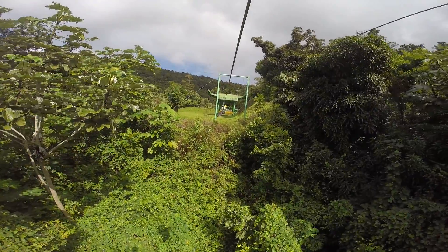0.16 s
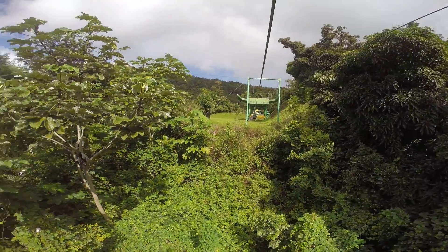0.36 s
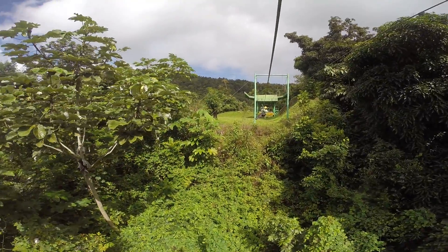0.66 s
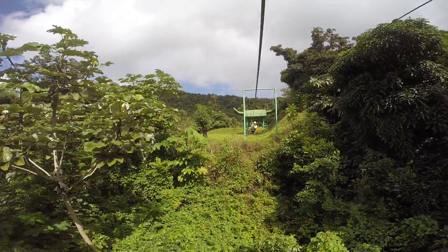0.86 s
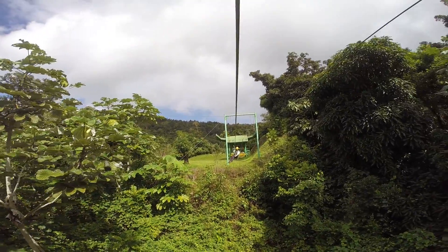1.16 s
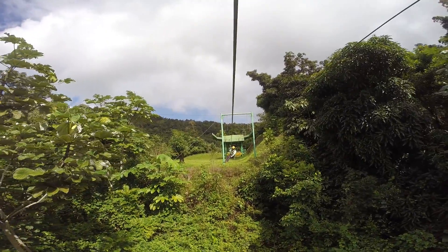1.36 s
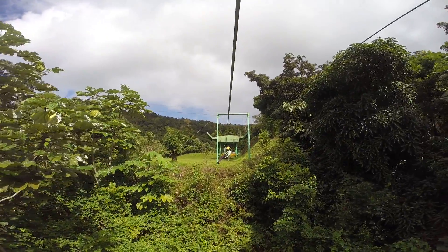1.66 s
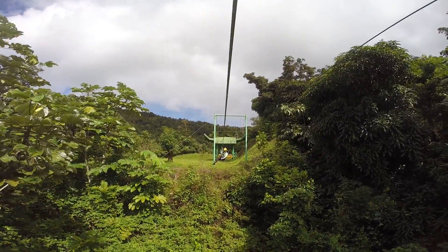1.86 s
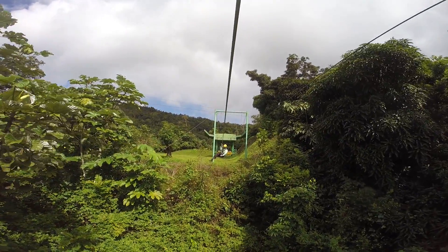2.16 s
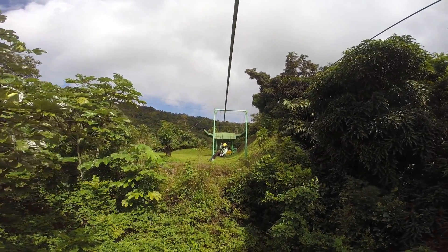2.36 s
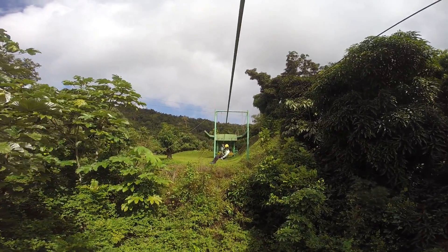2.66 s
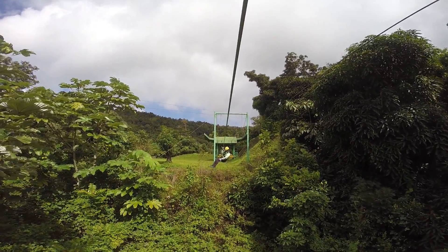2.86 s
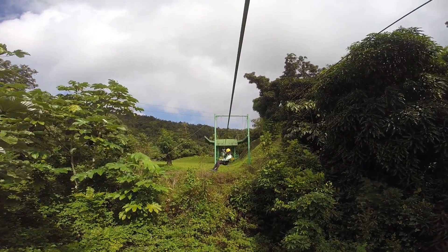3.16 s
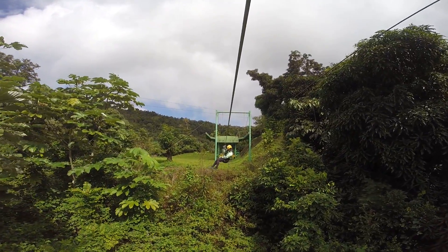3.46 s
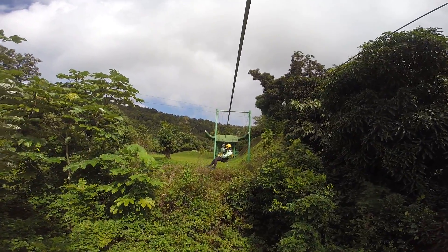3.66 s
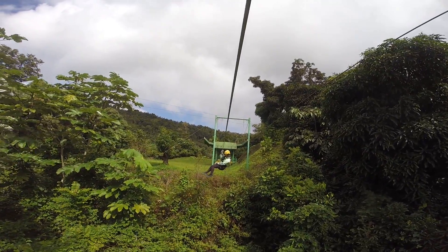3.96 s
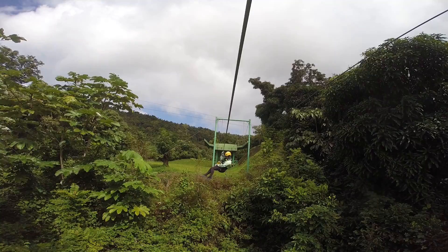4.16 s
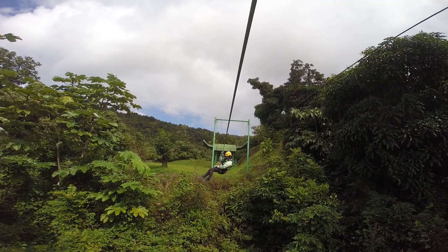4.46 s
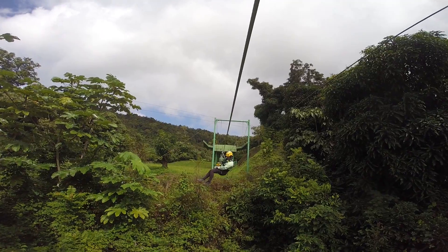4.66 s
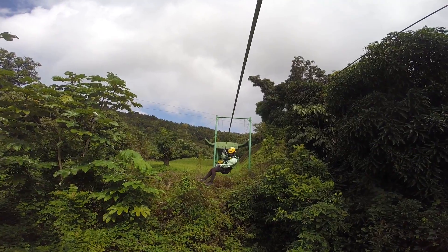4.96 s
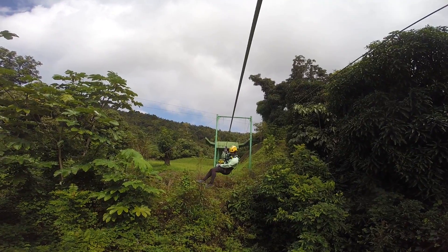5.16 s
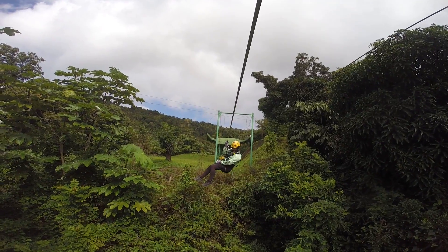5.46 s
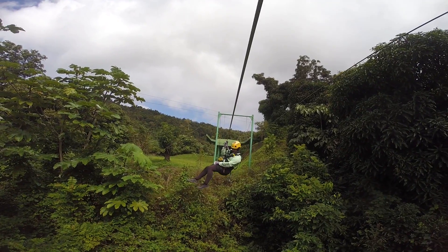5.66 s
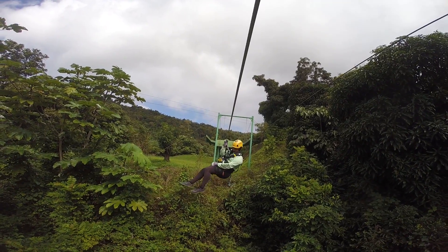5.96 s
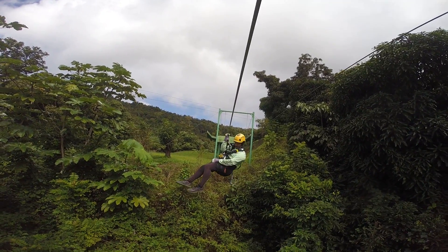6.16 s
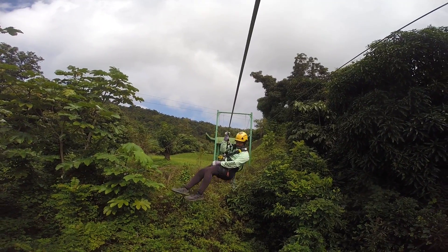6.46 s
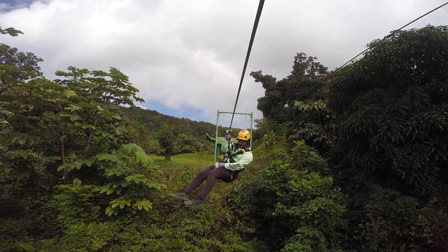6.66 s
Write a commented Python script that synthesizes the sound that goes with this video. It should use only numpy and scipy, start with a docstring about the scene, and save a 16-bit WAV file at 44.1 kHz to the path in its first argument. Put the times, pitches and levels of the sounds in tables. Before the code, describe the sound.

High, grinding whir of zipline wheels on a cable, easing slightly as gusts of wind thump and rumble outdoors.

```python
"""A zipline ride along a steel cable, heard from the seat. From the start a loaded sheave grinds on the
strands about 95 times a second and a loose one rattles, over rushing air and a faint electronic whine.
Wheel ticks cut in at once. Within half a second the headwind jolts the microphone's mount and a low hum
swells, returning near 2 s. By 3.3 s the loose sheave has spun down to a light rattle. A metallic ring
climbs to about 3.6 kHz and fades; then a steady ring near 3.06 kHz stands out as gusts buffet on."""
import sys
import numpy as np
from scipy import signal
from scipy.fft import rfft, irfft
from scipy.io import wavfile
from scipy.ndimage import uniform_filter1d

SR = 44100
rng = np.random.default_rng(int(sys.argv[2]) if len(sys.argv) > 2 else 0)


def inscribe(sig):
    """Save sig as 16-bit PCM at rate SR to the path in sys.argv[1].

    A 1-D sig is mono; a 2-D sig holds one channel per row.
    Samples are clipped to [-1, 1] before scaling.
    """
    pcm = np.round(np.clip(np.atleast_2d(sig).T, -1, 1) * 32767)
    wavfile.write(sys.argv[1], SR, pcm.astype(np.int16))


N = 301203
TIME = np.arange(N) / SR

# The trolley's two faders. Each row: time in seconds, frame ring in dB, strand rasp in dB.
WHIR_FADERS = [(0, -44.5, -53.5), (0.33, -47, -56), (0.55, -47, -53.5), (0.8, -46.5, -56.0),
               (1.2, -46, -56.5), (1.45, -45.5, -55.5), (1.6, -47.5, -58.0), (2.62, -49, -57),
               (2.75, -48, -57.0), (2.9, -49.5, -57), (3.3, -50.0, -59), (3.65, -49.0, -56.0),
               (4.15, -51, -58.5), (4.65, -49.5, -55.5), (5.75, -48.5, -55.5), (6.3, -53, -58.5),
               (6.6, -52.5, -60.5), (6.83, -51, -60)]
# The trolley frame's resonances. Each row: pitch in Hz, width in Hz, relative level in dB
# under the loaded sheave, the same under the loose one.
FRAME_RESONANCES = [(2437, 464, -4, 1.5), (2805, 214, -5.5, -6), (3034, 168, 0.3, -5.5),
                    (3277, 350, -5, -3.5), (3547, 255, -7.5, 2), (3912, 240, -10, -5)]
LOADED, LOOSE = 2, 3  # the two level columns


def from_db(db):
    """Decibels to gain."""
    return 10 ** (np.asarray(db) / 20)


def rms_one(x):
    """Scale to unit power."""
    return x / np.sqrt(np.mean(x ** 2) + 1e-20)


def in_time(rows):
    """Draw each column of an automation curve at every sample."""
    s, *columns = np.transpose(rows)
    return [np.interp(TIME, s, c) for c in columns]


def coloured(points):
    """Noise at unit power, shaped by an EQ curve."""
    hz, level_db = np.transpose(points)
    bins = np.maximum(np.arange(N // 2 + 1) * SR / N, 1)
    gain = from_db(np.interp(np.log(bins), np.log(hz), level_db)) / (1 + (bins / hz[-1] / 2) ** 2)
    return rms_one(irfft(rfft(rng.standard_normal(N)) * gain, N))


def drift(per_s):
    """A random wobble at unit power that heads for a new value this many times a second."""
    knots = rng.standard_normal(4096)
    return rms_one(np.interp(TIME * per_s, np.arange(len(knots)), knots))


def steadied(x, seconds):
    """Keep the grain of x but hold its level at 1 over longer spans."""
    return x / np.sqrt(uniform_filter1d(x ** 2, max(int(seconds * SR), 2)) + 1e-9)


def resonance(x, hz, width):
    """A two-pole resonance applied twice, gain 1 at its peak."""
    r = np.exp(-np.pi * width / SR)
    section = [(1 - r * r) / 2, 0, -(1 - r * r) / 2, 1, -2 * r * np.cos(2 * np.pi * hz / SR), r * r]
    return signal.sosfilt([section, section], x + 1e-18)


def contacts(turns_per_s, swing_db, skew, uneven_db, per_s, size_db):
    """Tiny impacts of wheel on wire swell and ebb once a turn; no two turns are equally hard."""
    turn = np.cumsum(turns_per_s) / SR
    hardness = rng.standard_normal(2048)[turn.astype(int)]
    angle = 2 * np.pi * turn
    load = from_db(uneven_db * hardness - swing_db * (skew * np.sin(2 * angle) + np.cos(angle)))
    sizes = from_db(size_db * np.minimum(rng.exponential(1, N), 4))
    return rms_one(load * sizes * (rng.random(N) < per_s / SR))


def loaded_sheave():
    """The wheel that carries the rider grinds on the strands in a dense, pulsing stream."""
    # Its speed. Each row: time in seconds, turns per second.
    speed_curve = [(0, 75), (0.7, 87), (1.6, 93), (2.3, 101), (2.8, 88.5), (3.2, 88.5), (3.65, 104),
                   (4.1, 95), (4.5, 94.5), (4.85, 97), (5.5, 114.6), (6.1, 94), (6.3, 83), (6.83, 92)]
    turns_per_s, = in_time(speed_curve)
    return contacts(turns_per_s, swing_db=5.0, skew=0.65, uneven_db=2.0, per_s=6000, size_db=2.0)


def loose_sheave(start_turns_per_s, decay_s):
    """The free wheel rattles as it spins down: its impacts, share of the whir and speed from 1 down."""
    # Faster spin, more rattle. Each row: turns per second, share of the power from 0 to 1.
    rattle_share = [(26, 0.16), (53, 0.75)]
    spin = np.exp(-TIME / decay_s)
    turns_per_s = start_turns_per_s * spin
    rattle = contacts(turns_per_s, swing_db=1.5, skew=0.54, uneven_db=0.14, per_s=2600, size_db=3.0)
    return rattle, np.interp(turns_per_s, *np.transpose(rattle_share)), spin


def metal(impacts, modes, column, travel_s, wander_db, even_s, bite_db=0):
    """Impacts strike each mode with a new strength; bending waves bring the high ones first."""
    out = np.zeros(N)
    for mode in modes:
        hz, width = mode[:2]
        height = hz / FRAME_RESONANCES[0][0]
        struck = np.roll(impacts, int(travel_s * SR / np.sqrt(height))) * rng.standard_normal(N)
        # a harder bite gains most in the highest modes
        struck *= from_db(bite_db * height ** 2)
        # the wheel shifts in its groove and favours now one mode, now another
        out += from_db(mode[column] + wander_db * drift(1.797)) * rms_one(resonance(struck, hz, width))
    return steadied(out, even_s)


def metallic_ring(impacts, hz, width, travel_s):
    """The impacts make a narrow resonance sing along a pitch curve."""
    carrier = np.exp(2j * np.pi * np.cumsum(hz) / SR)
    struck = np.roll(impacts, int(travel_s * SR)) * rng.standard_normal(N)
    r = np.exp(-np.pi * width / SR)
    ringing = carrier * signal.lfilter([1], [1, -2 * r, r * r], struck / carrier)
    return steadied(ringing.real, seconds=0.013)


def strand_rasp(grind, rattle, loose_gain):
    """The bright rasp of both sheaves, flaring when a flange bites into the strands."""
    # The trolley's treble resonances. Each row: pitch in Hz, width in Hz, relative level in dB
    # under the loaded sheave, the same under the loose one.
    modes = [(4314, 310, -2.5, 1.5), (4940, 810, -2.5, 4.5), (5580, 340, -3.5, 5), (6010, 530, 2, 3.5),
             (6515, 350, -6, -5), (7330, 780, -9, -0.5), (8730, 1340, -13.5, -1), (9475, 360, -12, -15.5),
             (10050, 2500, -8.5, -24), (11050, 400, -43, -7)]
    bite_db = 0.099 * np.clip(drift(70), -2, 2)
    loaded = metal(grind, modes, LOADED, travel_s=.006, wander_db=-1.9, even_s=0.21, bite_db=bite_db)
    loose = metal(rattle, modes, LOOSE, travel_s=.001, wander_db=2.5, even_s=0.14, bite_db=bite_db / 2)
    return np.sqrt(1 - loose_gain ** 3) * loaded + np.sqrt(loose_gain ** 3) * loose


def seat_ring(impacts, ring_db, spin):
    """A little shaking travels down into the seat, most while the loose sheave spins fast."""
    # The seat frame's hollow notes. Each row: pitch in Hz, width in Hz, relative level in dB.
    modes = [(1077, 180, -10.5), (1536, 280, -10), (1907, 310, -11.5)]
    gain = from_db(ring_db - 19 + 6 * spin ** 2)
    return gain * metal(impacts, modes, column=2, travel_s=.001, wander_db=0.5, even_s=0.054)


def trolley(ring_trim_db, rasp_trim_db):
    """Both sheaves sound the same frame, each with its own beat and colour."""
    # A metallic ring climbs to about 3.6 kHz and fades; then a steady one near 3.06 kHz stands out.
    # Each row: time in seconds, pitch in Hz, level in dB against the frame.
    sing_curve = [(0, 2724, -10), (1.3, 2940, -10.5), (2.4, 2814, -20), (3.3, 2910, -9.5),
                  (3.7, 2960, -3.5), (4.15, 3300, -7), (4.65, 3570, -4), (5.15, 3555, -14),
                  (5.35, 3067, -11), (6.83, 3056, -6.5)]
    sing_hz, sing_db = in_time(sing_curve)
    ring_db, rasp_db = in_time(WHIR_FADERS)
    grind = loaded_sheave()
    rattle, share, spin = loose_sheave(start_turns_per_s=97, decay_s=2.5)
    loose, loaded = np.sqrt([share, 1 - share])  # equal-power crossfade
    both = loaded * grind + loose * rattle
    frame = loaded * metal(grind, FRAME_RESONANCES, LOADED, travel_s=.006, wander_db=1.8, even_s=0.08)
    frame += loose * metal(rattle, FRAME_RESONANCES, LOOSE, travel_s=.001, wander_db=1.8, even_s=0.26)
    sing = from_db(sing_db) * metallic_ring(both, sing_hz, width=180, travel_s=0.0054)
    ring = (frame + sing) / np.sqrt(1 + from_db(sing_db) ** 2)
    rasp = strand_rasp(grind, rattle, loose)
    overtone = from_db(sing_db - 3.7) * metallic_ring(both, 1.58 * sing_hz, width=380, travel_s=.004)
    whir = from_db(ring_db + ring_trim_db) * ring + from_db(rasp_db + rasp_trim_db) * (rasp + overtone)
    # the small frame radiates little below its lowest mode
    whir = signal.sosfilt(signal.butter(10, 2160, "high", fs=SR, output="sos"), whir)
    return whir + seat_ring(both, ring_db, spin)


def headwind(shedding_hz, wander, squareness, boom_puff_db, flutter_puff_db):
    """Eddies shed by the rider flip the pressure to and fro, boom in the mount and flutter at the port."""
    # The wind's strength. Each row: time in seconds, level in dB.
    gusts = [(0, -62), (0.2, -45), (0.7, -51), (1.5, -43), (1.7, -53.5), (2.2, -34), (2.6, -39),
             (2.72, -49), (3.3, -52.5), (3.85, -44.5), (4.05, -50), (4.6, -34), (4.8, -40.5), (5.4, -36.0),
             (5.55, -66), (6.05, -40.0), (6.55, -34.0), (6.83, -38.0)]
    # The flutter's fader. Each row: time in seconds, level in dB.
    flutter_fader = [(0, -55.5), (.2, -65), (.88, -59), (1.11, -50), (1.27, -66), (2.3, -59), (4.1, -64),
                     (4.55, -56.5), (5.37, -53.5), (5.52, -68), (6.25, -55), (6.83, -54.5)]
    # The mount's deep boom. Each row: frequency in Hz, relative level in dB.
    boom_eq = [(15, -10.5), (30, 8), (39, -6), (50, 6), (60, 3), (72, -7), (100, -15.5), (160, -25),
               (400, -41)]
    # The low-mid flutter at the microphone's port. Each row: frequency in Hz, relative level in dB.
    flutter_eq = [(50, 1.5), (110, -4), (190, -2.5), (240, 0.5), (285, -1.5), (350, -6.5), (500, -18),
                  (1000, -29), (3000, -53)]
    gust_db = in_time(gusts)[0] + 44  # against an ordinary breeze at -44 dB
    flutter_db, = in_time(flutter_fader)
    eddy = np.sin(2 * np.pi * np.cumsum(shedding_hz * (1 + wander * drift(14))) / SR)
    buffet = from_db(-44 + 0.94 * gust_db) * rms_one(np.tanh(squareness * eddy))
    puffs = eddy + 0.73 * drift(18)
    boom = from_db(-49.3 + 0.39 * gust_db) * steadied(coloured(boom_eq), seconds=0.167)
    boom *= rms_one(from_db(boom_puff_db * puffs))
    flutter = from_db(flutter_db) * steadied(coloured(flutter_eq), seconds=0.11)
    flutter *= rms_one(from_db(flutter_puff_db * puffs))
    return buffet + boom + flutter


def air(level_db):
    """A soft, broad rush that rises a little with the whir."""
    # The colour of the rush. Each row: frequency in Hz, relative level in dB.
    air_eq = [(100, 11.5), (450, 3.5), (850, 1), (1100, 0), (1300, -0.5), (1550, -3), (2000, -5),
              (4000, -5), (8000, -16), (11500, -23.5), (12300, -26), (14500, -18)]
    ring_db, _ = in_time(WHIR_FADERS)
    return from_db(level_db + 0.12 * (ring_db - ring_db.mean())) * coloured(air_eq)


def whine():
    """The camera's electronics whine faintly, high in the treble."""
    # Thin, steady tones. Each row: pitch in Hz, rms level in dB.
    tones = [(11688, -88), (11718, -85.5), (14625, -93), (14655, -94)]
    return sum(np.sqrt(2) * from_db(db) * np.sin(2 * np.pi * (hz * TIME + rng.random()))
               for hz, db in tones)


def stray_ticks(per_s, over_ring_db, spread_db):
    """Cues for lesser knocks at random moments, their level riding on the frame's ring."""
    ring_db, _ = in_time(WHIR_FADERS)
    moments = np.flatnonzero(rng.random(N) < per_s / SR)
    level_db = ring_db + over_ring_db + spread_db * rng.standard_normal(N)
    return [(TIME[at], level_db[at]) for at in moments]


def wheel_ticks(trim_db, crack_lag_s):
    """Hard single knocks: a bright edge runs ahead, then a crack and a short ring of the frame."""
    # The hardest knocks. Each row: start in seconds, level in dB before the trim and low cut.
    hard_ticks = [(0.0992, -28), (0.4803, -30), (0.6075, -29), (1.2391, -28), (1.269, -31), (1.4684, -30),
                  (1.8098, -32), (2.1829, -31), (2.2223, -31), (2.7327, -29), (2.7566, -32), (5.1801, -35),
                  (5.905, -36), (6.0916, -36), (6.3734, -35)]
    out = np.zeros(N + SR)
    knock = signal.unit_impulse(SR // 20)
    edge = from_db(-19) * resonance(knock, hz=7000, width=2600)
    crack = resonance(knock, hz=2610, width=960)
    for s, level_db in list(hard_ticks) + stray_ticks(per_s=2.0, over_ring_db=10.5, spread_db=1.5):
        tail = sum(resonance(knock, hz, width) * from_db(db) * rng.standard_normal()
                   for hz, width, _, db in FRAME_RESONANCES)
        tick = edge + np.roll(crack + from_db(0.5) * tail, int(crack_lag_s * SR))
        at = round(s * SR)
        out[at:at + len(tick)] += from_db(level_db + trim_db) * tick / np.abs(tick).max()
    return signal.sosfilt(signal.butter(8, 2150, "high", fs=SR, output="sos"), out[:N])


def mount_jolts(attack_s):
    """A sharp gust sets the microphone's mount swinging with a low thump."""
    # The thumps. Each row: start in seconds, level in dB, pitch in Hz, seconds to fall by 60 dB.
    thumps = [(0.436, -29.5, 58.4, 0.36), (1.061, -32, 86, 0.12), (4.5, -36, 70, 0.28),
              (6.292, -31, 49.7, 0.14)]
    out = np.zeros(N)
    for s, db, hz, t60 in thumps:
        age = np.maximum(TIME - s, 0)
        envelope = np.exp(-np.log(1000) * age / t60) * (1 - np.exp(-age / attack_s))
        out -= from_db(db) * envelope * np.sin(2 * np.pi * hz * age)
    return out


def low_hums(waver, flicker, attack_s, release_s):
    """Twice a low, unsteady hum near 60 Hz swells, holds and fades."""
    # The notes. Each row: start in seconds, seconds until the release, first pitch in Hz,
    # last pitch in Hz, held level in dB.
    notes = [(0.436, 0.363, 63.03, 67.4, -46.5), (1.82, 0.33, 57.8, 56.7, -48)]
    out = np.zeros(N)
    for s, length, first_hz, last_hz, db in notes:
        hz = np.interp(TIME, [s, s + length], [first_hz, last_hz]) * (1 + waver * drift(16))
        swell = np.clip((TIME - s) / attack_s, 0, 1)
        fade = np.exp(-np.maximum(TIME - s - length, 0) / release_s)
        envelope = swell * fade * (1 + flicker * drift(5.4))
        out += np.sqrt(2) * from_db(db) * envelope * np.sin(2 * np.pi * np.cumsum(hz) / SR)
    return out


def scene():
    """Trolley and wind in open air: a mono mix with no echo."""
    mix = trolley(ring_trim_db=0.15, rasp_trim_db=-0.72)
    mix += headwind(shedding_hz=9.3, wander=0.172, squareness=2.36, boom_puff_db=1.0, flutter_puff_db=4.5)
    mix += air(level_db=-56.5) + whine()
    mix += wheel_ticks(trim_db=-1.5, crack_lag_s=.0005)
    mix += mount_jolts(attack_s=0.0021)
    mix += low_hums(waver=0.041, flicker=0.23, attack_s=0.062, release_s=0.15)
    return mix[None]


def record(dry):
    """A steep high cut at 15.2 kHz."""
    return signal.sosfilt(signal.ellip(12, .1, 80, 15200, fs=SR, output="sos"), dry)


dry = scene()
out = record(dry)
inscribe(out)
```